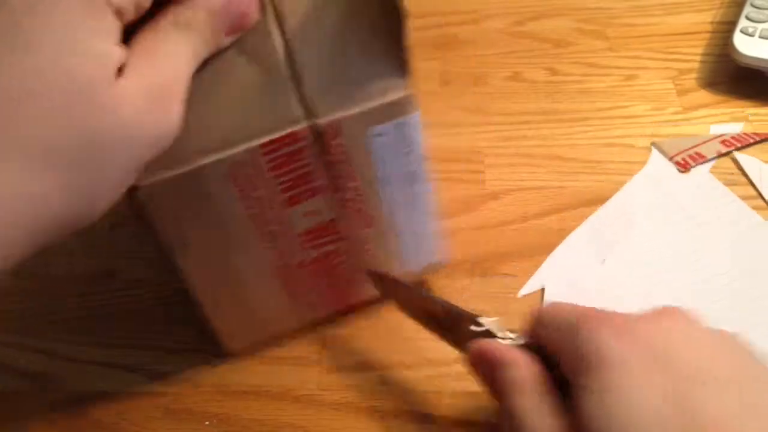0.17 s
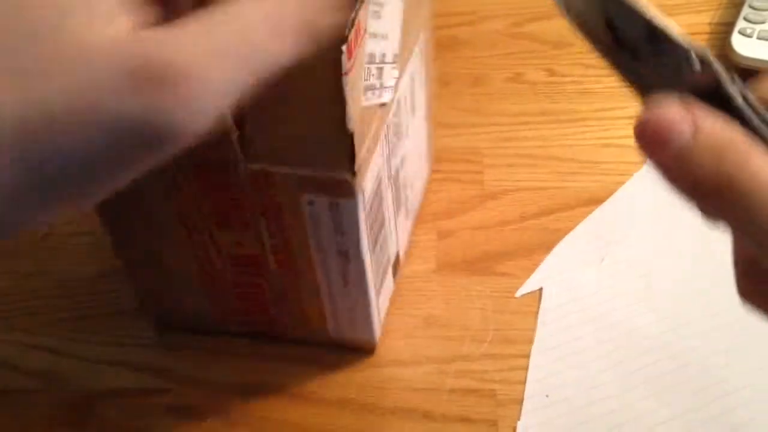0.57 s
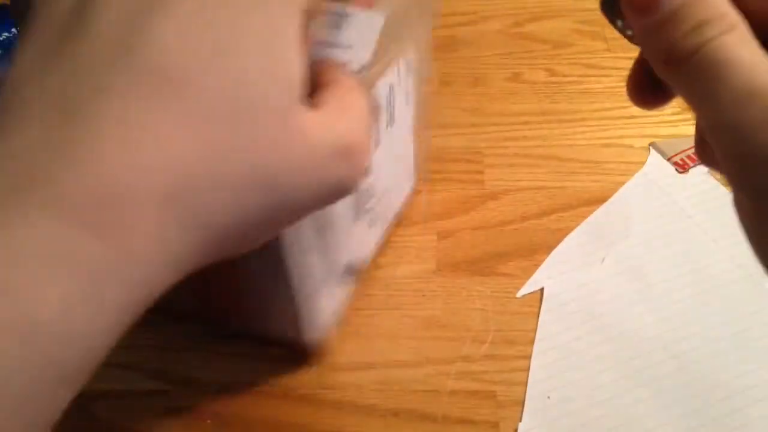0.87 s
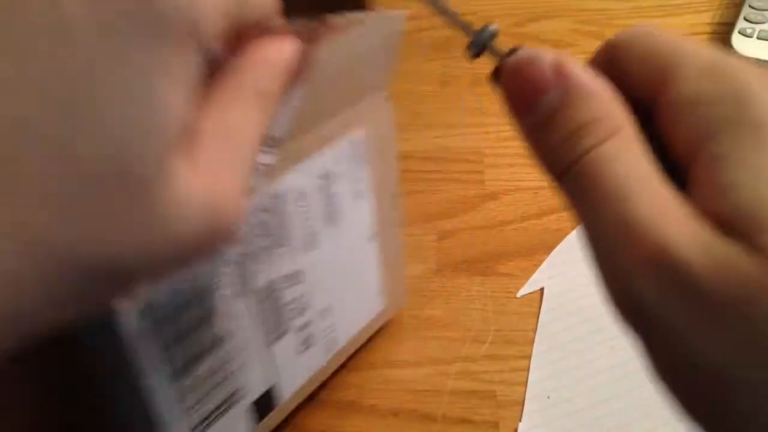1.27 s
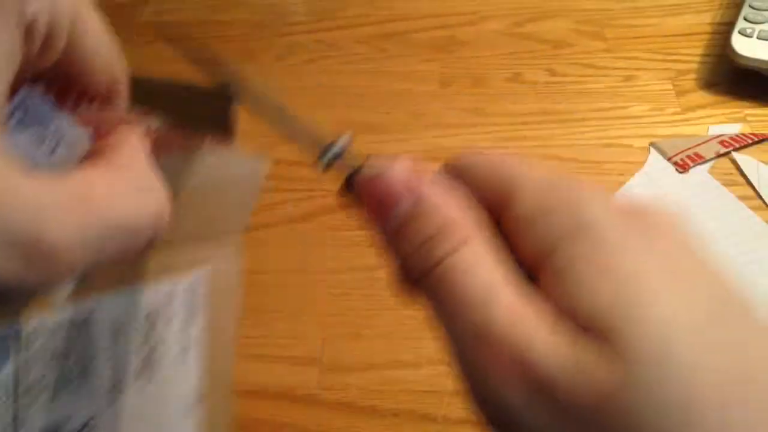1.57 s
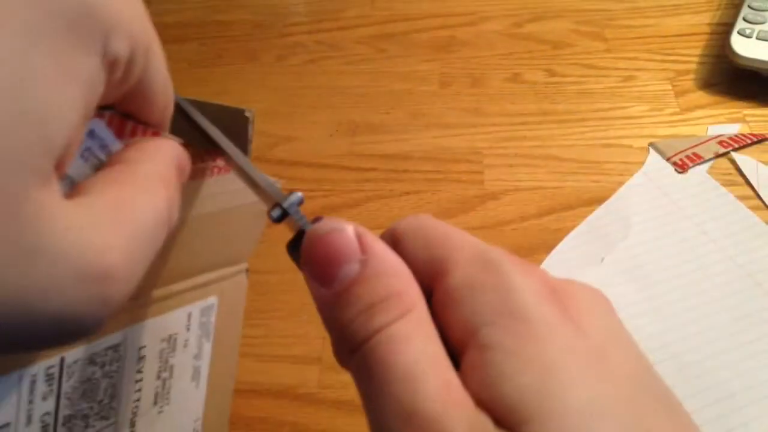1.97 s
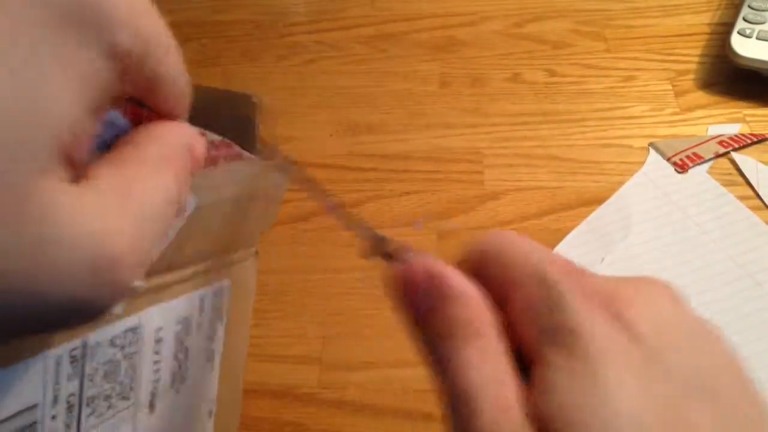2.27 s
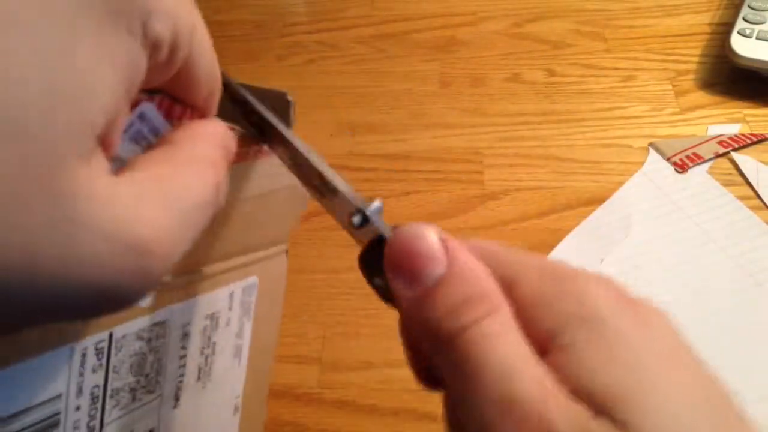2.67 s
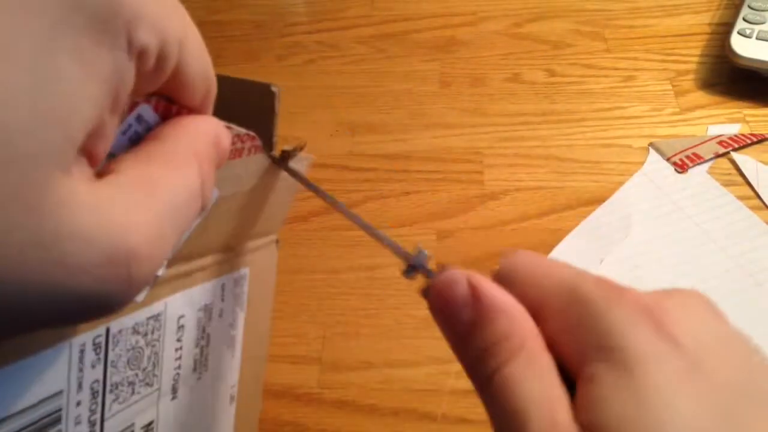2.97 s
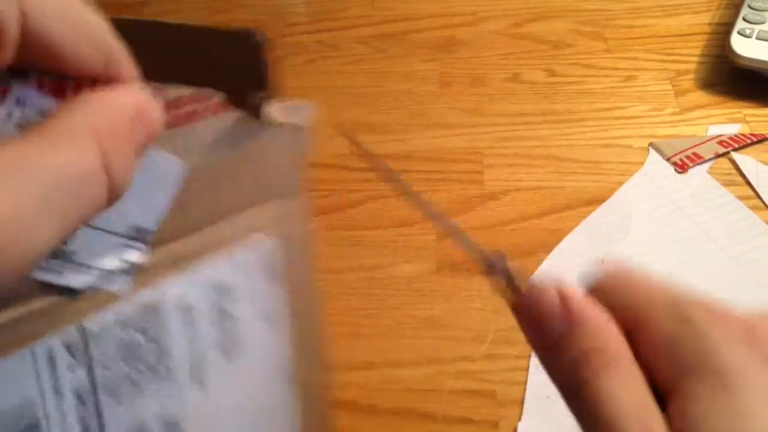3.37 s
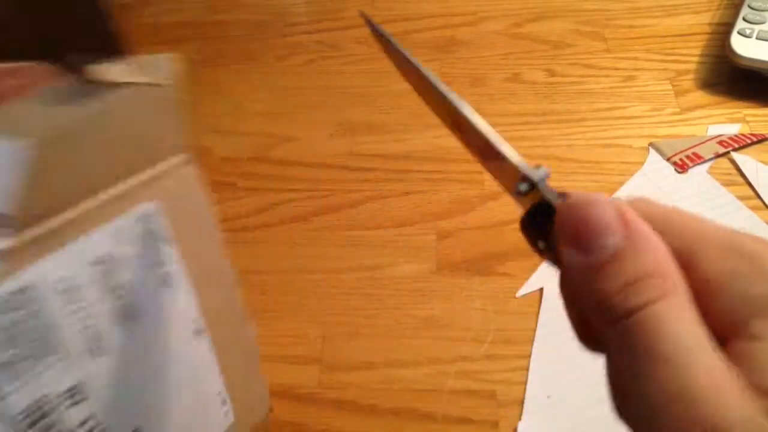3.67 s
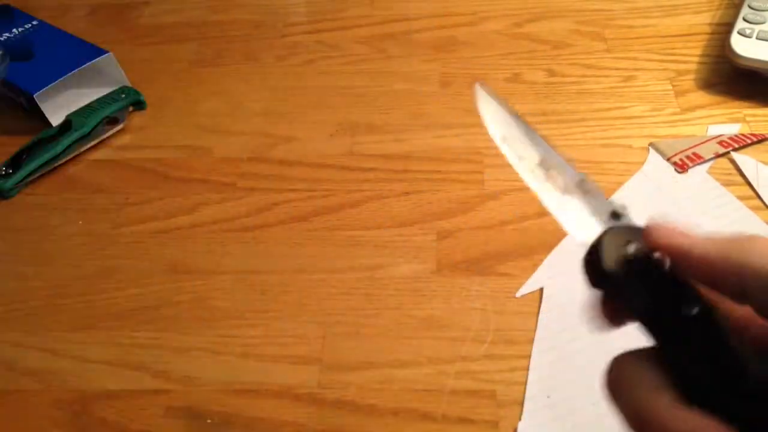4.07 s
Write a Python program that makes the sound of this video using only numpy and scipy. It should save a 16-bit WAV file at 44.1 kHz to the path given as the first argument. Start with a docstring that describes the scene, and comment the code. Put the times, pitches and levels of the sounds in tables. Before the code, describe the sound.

A folding knife slides along the tape of a small cardboard box with a thin, squeaky hiss, ripping through in a brighter slash at about 0.3 seconds. From 0.6 to 1.6 seconds hands turn the box on a wooden table: soft rubbing, brief juddering skids, hollow knocks and dry crinkles of tape. One more knock comes at 1.7 seconds, then a short lull. From 2.1 seconds the blade saws through a flap in short, coarse rasps, with loud snaps around 2.3 seconds. A sharp, hollow knock stands out at 2.7 seconds. More rasping strokes and clicks follow from 2.8 seconds, ending in a crack at about 3.25 seconds. A few lighter knocks, ticks and faint finger rubs trail off by 4 seconds. The sound is close and fairly dry, in a small quiet room with a faint steady background rumble and hiss.

```python
"""In a quiet room, close by, a folding knife slits the tape and edge of a small cardboard box on a
wooden table. One slash, the box is turned over by hand, then the blade saws through a flap in short
rasping strokes. Tiny snapping fibres make the rasp and shake the hollow box; its panels knock and
tick as they flex. Blade and fingers squeak as they slide, and the tape crinkles."""
import sys
import numpy as np
from scipy import signal
from scipy.fft import rfft, irfft
from scipy.io import wavfile
from scipy.ndimage import map_coordinates

SR = 44100
rng = np.random.default_rng(int(sys.argv[2]) if len(sys.argv) > 2 else 0)


def dump_mix(stems):
    """Bounce the given channels to the path in sys.argv[1] as a 16-bit WAV at rate SR."""
    frames = np.atleast_2d(stems).T  # one column per channel
    limited = np.clip(frames, -1, 1)  # hard clip at full scale
    pcm = np.round(limited * 32767).astype(np.int16)
    wavfile.write(sys.argv[1], SR, pcm)


N = 185352
TIME = np.arange(N) / SR

# the notes at which the hollow box rings: pitch_hz, level_db, ring_s
BOX_NOTES = [(151, 3.5, 0.026), (200, 7, 0.083), (267.5, -6, 0.038), (313, -10.5, 0.16),
             (380.3, -18.5, 0.14), (476, 0.5, 0.092), (605, 6, 0.073), (631.6, -2, 0.28),
             (721, -14.5, 0.049), (887, -1.5, 0.17), (954, 0.5, 0.1), (1143, -14, 0.0099),
             (1300, -5.5, 0.46), (1445, -7.5, 0.078), (1796, -6.5, 0.054), (2415, 2.5, 0.093),
             (3100, -12, 0.094), (3980, -18, .025)]
# the tone colour of a hissing paper edge: pitch_hz, level_db
EDGE_HISS = [(1500, -50.5), (3000, 4), (3900, 4.5), (5000, 2.5), (7000, 2), (10000, -0.5), (15000, -3)]


def from_db(db):
    """Turn decibels into a number to multiply a sound by."""
    return 10 ** (np.asarray(db) / 20)


def rms_one(x):
    """Scale a sound so that its average power is 1."""
    return x / np.sqrt(np.mean(x ** 2) + 1e-20)


def peak_one(x):
    """Scale a sound so that its highest peak is 1."""
    return x / np.abs(x).max()


def add(out, start_s, sound):
    """Mix a short sound in at the given time."""
    at = int(start_s * SR)
    out[at:at + len(sound)] += sound[:N - at]


def passband(x, hz, kind, order=2):
    """Keep the lows, the highs or a band between; a higher order cuts more steeply."""
    return signal.sosfilt(signal.butter(order, np.clip(hz, 10, .45 * SR), kind, fs=SR, output="sos"), x)


def colour(x, spectrum, size=4096):
    """Give a sound the tone colour drawn by rows of pitch_hz, level_db."""
    hz, db = np.transpose(spectrum)
    grid_hz = np.linspace(1, SR / 2, size // 2 + 1)
    gains = from_db(np.interp(np.log(grid_hz), np.log(hz), db))
    # fold the filter forward in time, so that nothing sounds before its cause
    cepstrum = irfft(np.log(gains))
    cepstrum[1:size // 2] *= 2
    cepstrum[size // 2 + 1:] = 0
    response = irfft(np.exp(rfft(cepstrum)))
    return signal.fftconvolve(x, response / np.linalg.norm(response))[:len(x)]


def ring(x, hz, ring_s):
    """Each click sets a pure note ringing, which fades by 60 dB in ring_s."""
    decay, turn = from_db(-60 / (ring_s * SR)), 2 * np.pi * hz / SR
    return signal.lfilter([0, np.sin(turn)], [1, -2 * decay * np.cos(turn), decay * decay], x + 1e-18)


def wander(hz):
    """A smooth random wobble, about 1 in size; a higher hz makes it quicker."""
    smooth = signal.butter(2, np.clip(hz, 1, .45 * SR), fs=SR, output="sos")
    return rms_one(signal.sosfilt(smooth, rng.standard_normal(N)))


def room_tone(level_db=-64.5):
    """The quiet room has a faint, steady rumble and hiss."""
    # its tone colour: pitch_hz, level_db
    room_colour = [(15, -44), (25, -13), (181, 1.5), (450, -7), (769, -14), (1300, -14), (2500, -17),
                   (4000, -15.5), (7000, -14.5), (15000, -17)]
    return from_db(level_db) * colour(rng.standard_normal(N), room_colour)


def room_echo(x, low_ring_s=0.48, high_ring_s=0.46, split_hz=2100, low_db=-15, high_db=-19):
    """Many echoes blur together in a small furnished room; the treble dies first."""
    t, response = TIME[:SR // 2], 0
    build_up = np.clip((t - .004) / .008, 0, 1)
    for kind, ring_s, db in ("low", low_ring_s, low_db), ("high", high_ring_s, high_db):
        tail = rng.standard_normal(len(t)) * from_db(-60 * t / ring_s) * build_up
        response += from_db(db) * passband(tail / np.linalg.norm(tail), split_hz, kind, order=4)
    return signal.fftconvolve(x, response)[:N]


def near_echoes(x):
    """Very quick echoes strengthen some pitches and weaken others."""
    # bounces off the table, the flaps and the hands: delay_s, gain
    bounces = [(.0009, 0.012), (.00155, 0.055), (.0029, 0.34), (.0041, 0.16)]
    response = signal.unit_impulse(512)
    for delay_s, gain in bounces:
        response[int(delay_s * SR)] += gain
    return signal.fftconvolve(x, response / np.linalg.norm(response))[:N]


def fibres(per_s, spread_db):
    """Fibres snap at random moments; most of the snaps are small."""
    sizes = from_db(spread_db * np.minimum(rng.exponential(1, N), 4)) * rng.choice([-1, 1], N)
    return rms_one(sizes * (rng.random(N) < per_s / SR))


def papery(snaps, cycles=7, count=18):
    """Each snap flicks a scrap of paper that has a brief pitch of its own."""
    scrap = rng.integers(0, count, N)
    pitches_hz = np.geomspace(700, 15000, count)
    return rms_one(sum(hz * ring(snaps * (scrap == k), hz, cycles / hz)
                       for k, hz in enumerate(pitches_hz)))


def through_box(x, resonance=0.69):
    """A push on the cardboard is heard directly and through the ringing of the box."""
    ringing = sum((-1) ** k * from_db(db) * ring(x, hz, ring_s) * np.log(1e6) / (ring_s * SR)
                  for k, (hz, db, ring_s) in enumerate(BOX_NOTES))
    return x + 2 * resonance * ringing


def flex(x, bend_octaves=.09, pace_hz=4):
    """The pitches in a rasp bend slowly up and down as the box is squeezed and cut."""
    position = np.cumsum(2 ** (bend_octaves * wander(pace_hz)))
    return rms_one(map_coordinates(x, [position], order=3, mode="wrap"))


def slit_echo(x, delay_s=0.000595, drift_octaves=0.31, pace_hz=9, echo=.35):
    """The hiss echoes inside the opening slit; as the path changes, its tone colour shifts."""
    lag = delay_s * SR * 2 ** (drift_octaves * wander(pace_hz))
    return rms_one(x + echo * map_coordinates(x, [np.arange(N) - lag], order=3))


def pressure_db(full_s, rise_s, hold_s, fall_s, range_db=20):
    """A touch swells to full pressure, holds and lets go, moving by range_db per rise or fall time."""
    before = np.maximum(full_s - TIME, 0) / rise_s
    after = np.maximum(TIME - full_s - hold_s, 0) / fall_s
    return -range_db * (before + after)


def stroke_levels(strokes, fall_shares=(0.74, 1, 0.78)):
    """Panels, rasp and hiss all follow the pressure; each fades in its own share of the fall time."""
    power = np.zeros((3, N))
    for full_s, rise_s, hold_s, fall_s, *levels_db in strokes:
        for layer, (db, share) in enumerate(zip(levels_db, fall_shares)):
            level_db = db + pressure_db(full_s, rise_s, hold_s, fall_s * share)
            power[layer] += from_db(np.maximum(level_db, -140)) ** 2
    return np.sqrt(power)


def scrape(strokes, per_s, spread_db, slip_hz, slip_db, clump_db, snag_db, panel_db, rasp_db, hiss_db,
           panel_low_hz, panel_top_hz, hiss_top_hz, paper=1.38, clump_hz=35, snag_hz=110):
    """Sticking and slipping bunch the snaps, which shake the panels, rasp and hiss at the edge."""
    # the tone colour of the flexing panels: pitch_hz, level_db
    panel_colour = [(25, -58), (52, -5.5), (80, -20.5), (125, 0.5), (190, 3), (270, -7.5), (430, 2.5),
                    (650, -20.5), (1000, -18.5), (2500, -35)]
    # the tone colour of tearing cardboard: pitch_hz, level_db
    rasp_colour = [(300, -37), (620, -0.5), (1000, 4.5), (1750, 0), (2150, -1.5), (3100, -10), (4200, -12),
                   (8000, -51)]
    grip = from_db(slip_db * wander(slip_hz) + clump_db * wander(clump_hz))
    snaps = rms_one(fibres(per_s, spread_db) * grip)
    crackle = snaps + paper * papery(fibres(2 * per_s, spread_db) * grip)
    push = passband(snaps, panel_top_hz, "low")   # a soft touch reaches only the lowest notes
    push = passband(push, panel_low_hz, "high")   # a flap held in the air gives little bass
    snags = from_db(snag_db * wander(snag_hz))   # the edge tears in short spurts
    panels = rms_one(colour(through_box(push), panel_colour))
    rasp = flex(colour(through_box(crackle), rasp_colour))
    hiss = slit_echo(passband(colour(crackle * snags, EDGE_HISS), hiss_top_hz, "low"))
    panel_level, rasp_level, hiss_level = stroke_levels(strokes)
    return (from_db(panel_db) * panel_level * panels
            + from_db(rasp_db) * rasp_level * rasp
            + from_db(hiss_db) * hiss_level * hiss)


def hands():
    """Hands slide over the box and the knife with a soft rubbing sound."""
    # each rub: full_pressure_s, rise_s, hold_s, fall_s, panel_db, rasp_db, hiss_db
    rubs = [(.6, 0.066, 0.049, 0.084, -46.5, -57.5, -54.5), (.658, 0.037, 0.032, 0.06, -42, -54.5, -50),
            (.733, 0.01, 0.021, 0.025, -48, -50, -42.5), (.765, 0.053, 0.051, 0.15, -35.5, -56.5, -55.5),
            (.828, 0.0087, 0.0047, 0.064, -32, -47, -49), (.959, 0.052, 0.035, 0.068, -57, -54, -59),
            (1.0, 0.029, 0.05, 0.067, -40.5, -54.5, -53.5), (1.052, 0.051, 0.0021, 0.11, -37, -61, -59),
            (1.112, 0.062, 0.022, 0.025, -48, -53.5, -54),
            (1.135, 0.014, 0.017, 0.068, -31.5, -41.5, -44.5), (1.21, 0.015, 0.083, 0.21, -47, -61, -67),
            (1.48, 0.047, 0.006, 0.18, -42.5, -61.5, -58), (1.555, 0.038, 0.021, 1, -58.5, -67, -69),
            (1.903, 0.13, 0.042, 0.041, -57.5, -66, -71), (3.385, 0.041, 0.0098, 0.18, -50.5, -60.5, -54.5),
            (3.745, 0.087, 0.033, 0.12, -57.5, -60, -66), (3.905, 0.043, 0.065, 0.019, -56, -64, -62)]
    return scrape(rubs, per_s=4300, spread_db=1.5, slip_hz=156, slip_db=1.0, clump_db=3.1, snag_db=1.5,
                  panel_db=-0.5, rasp_db=3.0, hiss_db=-3.0,
                  panel_low_hz=34.9, panel_top_hz=323, hiss_top_hz=15400)


def crinkles(per_s=5000, spread_db=2.5, size=4096):
    """Patches of tape give way under the fingers, each in a short dry crunch."""
    # the last few are a finger creeping in nearly even slips: start_s, level_db, fall_s, brightness_hz
    patches = [(.955, -44.5, .004, 2000), (.964, -43, 0.0058, 1500), (.998, -43, 0.013, 3000),
               (1.028, -47, 0.0025, 3000), (1.041, -37.5, 0.0068, 12200), (1.078, -41.5, 0.013, 9000),
               (1.112, -38, .004, 2500), (1.175, -38, .003, 5000), (1.217, -50, .005, 3000),
               (1.2448, -41.5, 0.0052, 2100), (1.27, -39.5, .005, 2500), (1.29, -41.5, 0.0056, 2000),
               (1.309, -46, 0.0045, 2500), (1.329, -44.5, .004, 2500), (1.357, -43.5, .003, 700)]
    # the tone colour of the tape: pitch_hz, level_db
    tape_colour = [(150, -18), (400, 4), (1000, 3.5), (2000, -3.5), (4000, -9), (15000, -16)]
    out, t = np.zeros(N), TIME[:size]
    snaps = fibres(per_s, spread_db)
    for k, (start_s, db, fall_s, bright_hz) in enumerate(patches):
        fade = np.exp(-t / fall_s)
        burst = snaps[k * size:(k + 1) * size] * fade
        crunch = passband(colour(burst, tape_colour), bright_hz, "low", order=1)
        add(out, start_s, from_db(db) * rms_one(crunch) * np.sqrt(np.mean(fade ** 2)))
    return out


def squeaks(gain_db=-1):
    """The blade in the slit and fingers on tape and handle rub out rough tones that glide."""
    # each squeak: loudest_s, rise_s, fall_s, pitch_hz, width_hz, glide_octaves_per_s, level_db
    slides = [(0.041, 0.041, 0.22, 624, 48, -0.6, -43.5), (.09, 0.35, 0.1, 321, 22, 0.1, -51),
              (0.109, 0.12, 0.066, 1220, 34, 0, -46), (0.122, 0.07, 0.06, 3560, 240, 0.6, -40),
              (.137, 0.015, 0.014, 3394, 450, 2.5, -34.5), (0.292, 0.014, 0.08, 2895, 350, -3, -29),
              (.293, 0.0036, 0.013, 10800, 1500, -1, -39), (.304, 0.011, 0.031, 12100, 180, -7, -47),
              (0.346, 0.0096, 0.11, 1790, 120, 1.5, -35), (0.403, 0.069, 0.051, 1900, 130, 1.5, -46),
              (0.767, 0.0138, 0.21, 390, 14, 2.9, -48), (2.279, 0.016, 0.024, 6000, 290, -4, -38),
              (3.751, 0.046, 0.05, 2096, 230, 2.5, -54.5), (3.914, 0.027, 0.017, 2100, 130, -6, -52),
              (3.915, 0.018, 0.039, 3100, 350, -1.5, -57)]
    out = np.zeros(N)
    for loudest_s, rise_s, fall_s, hz, width_hz, glide, db in slides:
        pitch_hz = hz * 2 ** (glide * np.clip(TIME - loudest_s, -rise_s, fall_s))
        phase = 2 * np.pi * np.cumsum(pitch_hz) / SR
        tone = wander(width_hz) * np.cos(phase) + wander(width_hz) * np.sin(phase)
        out += tone * from_db(gain_db + db + pressure_db(loudest_s, rise_s, 0, fall_s))
    return out


def judders(jitter=0.057, roughness_db=-3.0, overtone_db=-9, gain_db=-1):
    """Nearly even slips shake a panel at their own rate and an octave above."""
    # the box judders on the table, or the blade bumps over ribs: start_s, length_s, rate_hz, level_db
    skids = [(0.754, 0.0664, 202, -33.5), (0.822, 0.05, 114, -40.5), (1.021, 0.03, 207, -43.5),
             (2.218, 0.052, 214, -26), (2.804, 0.069, 130, -40), (2.931, 0.034, 178, -30),
             (3.252, 0.034, 188, -34)]
    out = np.zeros(N)
    for start_s, length_s, hz, db in skids:
        count = int(length_s * SR)
        rate_hz = hz * (1 + jitter * wander(hz=35)[:count])
        phase = 2 * np.pi * np.cumsum(rate_hz) / SR
        swing = np.sin(phase) + from_db(overtone_db) * np.sin(2 * phase)
        swing *= from_db(roughness_db * wander(hz=110)[:count])
        add(out, start_s, from_db(db + gain_db) * rms_one(swing) * signal.windows.tukey(count, .5))
    return out


def ticks(crumble=0.13, crumble_s=0.0023, edge_db=2, top_hz=9500, gain_db=-1, size=4096):
    """A crease gives way, then smaller ones; they sound through the box and, brighter, off the edge."""
    # creases in tape and paper edges: start_s, level_db, treble_db
    creases = [(0.436, -32.5, -8), (.729, -36, -14), (.752, -29.5, -14), (0.8236, -23.5, -9),
               (1.1268, -23, -2), (1.1474, -19, -8.5), (2.071, -38, 1), (2.29, -11.5, -11),
               (2.3418, -11.5, 5), (2.6586, -21, -18.5), (2.748, -39, 5), (3.1665, -16.5, -2.5),
               (3.299, -16, -18), (3.402, -24.5, -10.5), (3.742, -37.5, -5), (3.869, -42, -25),
               (3.894, -36.5, -24)]
    # the tone colour of a tick: pitch_hz, level_db
    tick_colour = [(100, -15.5), (400, 12.5), (1000, 6.5), (1800, 0), (3000, -7), (5000, -11.5),
                   (15000, -70)]
    out, fade = np.zeros(N), np.exp(-TIME[:size] / crumble_s)
    for start_s, db, treble_db in creases:
        crack = signal.unit_impulse(size) + crumble * rng.standard_normal(size) * fade
        body = colour(through_box(crack), tick_colour)
        edge = passband(colour(crack, EDGE_HISS), top_hz, "low")
        add(out, start_s, from_db(db + gain_db) * peak_one(body + from_db(treble_db + edge_db) * edge))
    return out


def knocks(focus_octaves=0.37, ring_share=0.51, clack=0.019, clack_cycles=5, top_ratio=2.15,
           rattle=0.021, rattle_s=0.023, size=8192):
    """A panel buckles or is bumped: the spot thuds and clacks, loose flaps rattle, the box rings on."""
    # each bump: start_s, level_db, brightness_hz, lowest_hz, ring_centre_hz, ring_db
    bumps = [(0.303, -29, 410, 171, 300, 2), (.319, -27.5, 322, 150, 171, -1),
             (0.589, -42.5, 500, 179, 320, -0.5), (0.659, -42, 454, 170, 257, -15),
             (0.831, -30, 337, 90, 172, 1), (1.03, -35, 380, 140, 200, 3), (1.052, -26.5, 350, 150, 210, 1),
             (1.127, -22.5, 460, 90, 142, -2.5), (1.463, -40, 260, 120, 185, 8),
             (1.474, -37, 1030, 250, 900, -9.5), (1.491, -43.5, 480, 200, 397, -1.5),
             (1.558, -40, 1020, 220, 900, -7.5), (1.7393, -23.5, 500, 160, 338, -6.5),
             (1.906, -56, 396, 220, 315, 7), (1.936, -52.5, 429, 240, 347, -6),
             (2.303, -13, 710, 150, 200, -9), (2.373, -23.5, 500, 149, 333, -4),
             (2.468, -41, 277, 108, 180, 1), (2.66, -8.5, 880, 167, 340, -15),
             (2.748, -32, 1216, 220, 380, -16), (3.1679, -17, 1380, 280, 292, -16),
             (3.246, -17.5, 690, 260, 300, -6), (3.3, -24.5, 690, 200, 636, 1),
             (3.384, -36.5, 295, 150, 238, 3), (3.404, -32.5, 817, 200, 985, -7.5),
             (3.57, -56.5, 347, 129, 200, 7), (3.9475, -38.5, 645, 250, 440, -5),
             (3.956, -39, 590, 169, 287, -4.5), (4.01, -49, 1100, 170, 294, -12)]
    out, click, t = np.zeros(N), signal.unit_impulse(size), TIME[:size]
    for start_s, db, bright_hz, low_hz, centre_hz, ring_db in bumps:
        force = click + rattle * rng.standard_normal(size) * np.exp(-t / rattle_s) * (t > .002)
        thud = passband(force, bright_hz, "low")
        thud = passband(thud, low_hz, "high", order=3)   # small panels give no bass
        spot = ring(force, bright_hz, clack_cycles / bright_hz)
        contact = peak_one(thud) + clack * peak_one(spot)
        contact = passband(contact, top_ratio * bright_hz, "low", order=5)
        ringing = np.zeros(size)
        for k, (hz, note_db, ring_s) in enumerate(BOX_NOTES):
            nearness = 1 / (1 + (np.log2(hz / centre_hz) / focus_octaves) ** 4)
            gain = (-1) ** k * from_db(note_db + rng.normal(0, 1)) * nearness
            ringing += gain * ring(click, hz, ring_s * ring_share)
        ringing = passband(ringing, low_hz, "high", order=3)
        add(out, start_s, from_db(db) * (peak_one(contact) + from_db(ring_db) * peak_one(ringing)))
    return out


def rips(per_s=7000, spread_db=3.5, band_ratio=1.133, paper=0.43, top_hz=12500, gain_db=-2.5, size=8192):
    """The blade rips ahead or the box skids: a dense burst of snaps swells and dies."""
    # each sudden slip: loudest_s, level_db, rise_s, fall_s, pitch_hz, hiss_db
    slips = [(.2915, -24, 0.00045, 0.017, 1770, -1), (.344, -17.5, 0.001, 0.0016, 1800, -25),
             (.758, -36, 0.001, 0.029, 120, -30), (.829, -33, 0.0036, 0.016, 350, -16.5),
             (1.14, -34, 0.0078, 0.014, 105, -27), (2.187, -28, 0.0097, 0.0096, 1350, -14),
             (2.288, -29, 0.0071, 0.0085, 900, -10.5), (2.312, -34, 0.017, 0.013, 79, -47.5),
             (2.34, -17, 0.0037, 0.0022, 1110, -10.5), (2.8, -28.5, 0.011, 0.022, 353, -14),
             (2.984, -22.5, 0.004, 0.008, 422, -23), (3.246, -25, 0.0035, 0.0028, 900, -6),
             (3.298, -28.5, 0.00062, 0.0016, 2470, -25)]
    out, t = np.zeros(N), (np.arange(size) - size // 2) / SR
    snaps = fibres(per_s, spread_db)
    board = through_box(snaps)
    crackle = snaps + paper * papery(fibres(per_s, spread_db))
    edge = passband(colour(crackle, EDGE_HISS), top_hz, "low")
    for k, (loudest_s, db, rise_s, fall_s, hz, hiss_db) in enumerate(slips):
        part = slice(k * size, (k + 1) * size)
        swell = np.exp(np.minimum(t / rise_s, -t / fall_s))
        body = passband(board[part], [hz / band_ratio, hz * band_ratio], "band")
        burst = rms_one(body * swell) + from_db(hiss_db) * rms_one(edge[part] * swell)
        add(out, loudest_s + t[0], from_db(db + gain_db) * burst * np.sqrt(np.mean(swell ** 2)))
    return out


def catches(per_s=2500, spread_db=9.0, crunch=0.26, gain_db=-1, size=8192):
    """The blade snaps a rib, fibres crunch, and the flap rings at a pitch set by its free length."""
    # ribs inside the cardboard: start_s, level_db, crunch_s, pitch_ratio, tilt_db_per_octave, crack_db
    ribs = [(2.1, -30, 0.0046, 1.1, -8.5, -2), (2.182, -27, 0.0098, 0.81, 0, -4),
            (2.217, -27.5, 0.0075, 0.78, -6.5, -13), (2.3397, -11, 0.0051, 0.97, 1, -26),
            (2.79, -27, 0.018, 0.93, 0.5, -8), (2.837, -23, 0.0028, 0.81, 0.5, -10),
            (2.9345, -24, 0.0036, 0.83, 3.5, -4), (2.9495, -30.5, 0.0022, 0.89, 19, 0),
            (2.98, -30, 0.0066, 1.23, -2.5, -9), (2.987, -22, 0.004, 1.04, -0.5, -9.5),
            (3.2445, -12, 0.0018, 1, -4, -22)]
    # the notes of the half-cut flap: pitch_hz, level_db, ring_s
    flap_notes = [(430, -6, .04), (740, -6, .05), (1135, -1, .022), (1350, -5, .02), (1775, -1, .022),
                  (3030, -7, .012), (3990, -1, .008)]
    out, t = np.zeros(N), TIME[:size]
    snaps = fibres(per_s, spread_db)
    for k, (start_s, db, crunch_s, ratio, tilt_db, crack_db) in enumerate(ribs):
        crumble = snaps[k * size:(k + 1) * size] * np.exp(-t / crunch_s)
        force = signal.unit_impulse(size) + crunch * crumble
        flap = np.zeros(size)
        for j, (hz, note_db, ring_s) in enumerate(flap_notes):
            gain = (-1) ** j * from_db(note_db + tilt_db * np.log2(hz / 1000))
            flap += gain * ring(force, hz * ratio, ring_s)
        crack = from_db(crack_db) * peak_one(colour(crumble, EDGE_HISS))
        add(out, start_s, from_db(db + gain_db) * (peak_one(flap) + crack))
    return out


def slash():
    """The blade runs along the tape; the snaps come so thickly that they blur together."""
    # parts of the slash: full_pressure_s, rise_s, hold_s, fall_s, panel_db, rasp_db, hiss_db
    strokes = [(.04, 0.041, 0.097, 0.11, -60.5, -44.5, -54.5),
               (.13, 0.15, 0.048, 0.044, -70.5, -52.5, -45.5),
               (.235, 0.073, 0.0505, 0.03, -51, -48.5, -54.5),
               (.2905, 0.0027, 0.021, 0.11, -40, -30.5, -31)]
    return scrape(strokes, per_s=12000, spread_db=1.5, slip_hz=120, slip_db=-0.5,
                  clump_db=0.55, snag_db=0.5, panel_db=7.5, rasp_db=-1.0, hiss_db=-3.5,
                  panel_low_hz=75, panel_top_hz=900, hiss_top_hz=10900)


def sawing():
    """The blade saws through the flap; fewer, more uneven snaps make a coarse rasp."""
    # each stroke: full_pressure_s, rise_s, hold_s, fall_s, panel_db, rasp_db, hiss_db
    strokes = [(2.069, 0.027, 0.012, 0.067, -41, -47.5, -78),
               (2.102, 0.014, 0.048, 0.045, -40.5, -40, -51.5),
               (2.187, 0.059, 0.0031, 0.033, -33, -35, -38), (2.222, 0.04, 0.05, 0.056, -33, -31.5, -36.5),
               (2.278, 0.096, 0.0089, 0.066, -27.5, -26.5, -35.5),
               (2.34, 0.029, 0.011, 0.063, -31.5, -34, -40), (2.776, 0.041, 0.0058, .02, -35, -40.5, -48),
               (2.793, 0.0064, 0.013, 0.071, -26, -32.5, -40),
               (2.838, 0.057, 0.05, 0.055, -33.5, -36.5, -44.5),
               (2.937, 0.019, 0.015, 0.028, -27, -30.5, -37.5),
               (2.983, 0.016, 0.01, 0.017, -29, -30, -35.5), (3.01, .03, 0.046, 0.035, -49.5, -47.5, -53.5),
               (3.088, 0.033, 0.019, 0.03, -37.5, -37.5, -42.5), (3.178, 0.011, 0.046, .05, -52, -54, -49),
               (3.243, 0.046, 0.0049, 0.015, -25.5, -26, -32), (3.258, .01, 0.02, 0.077, -35, -38, -49)]
    return scrape(strokes, per_s=2200, spread_db=2.0, slip_hz=198, slip_db=2.0,
                  clump_db=0.5, snag_db=1.0, panel_db=-0.5, rasp_db=-3.5, hiss_db=-1,
                  panel_low_hz=75, panel_top_hz=900, hiss_top_hz=17000)


def scene():
    """Knife, hands and box sound together in the room, in one channel."""
    cuts_and_rubs = slash() + sawing() + hands() + squeaks() + rips() + ticks() + crinkles()
    near = near_echoes(cuts_and_rubs) + judders() + knocks() + catches()
    return (room_tone() + near + room_echo(near))[None]


def record(dry, low_cut_hz=35, top_cut_hz=15400):
    """The small microphone loses the deepest bass; the highest treble is cut steeply."""
    thin = passband(dry, low_cut_hz, "high", order=3)
    return signal.sosfilt(signal.ellip(12, .1, 80, top_cut_hz, fs=SR, output="sos"), thin)


dry = scene()
out = record(dry)
dump_mix(out)
```